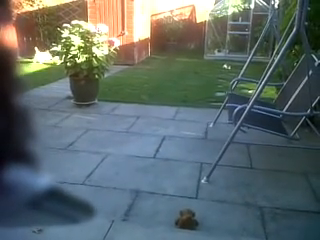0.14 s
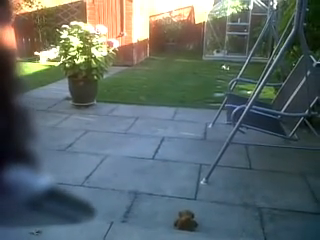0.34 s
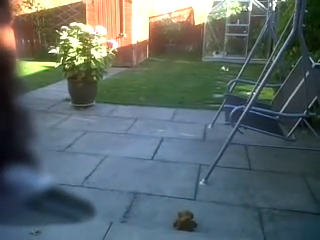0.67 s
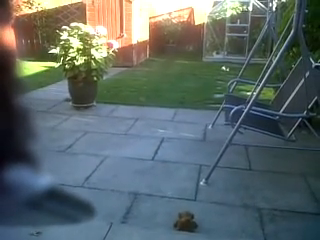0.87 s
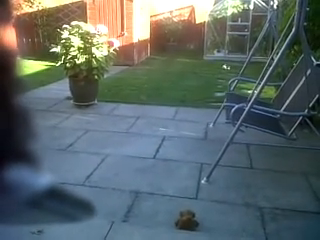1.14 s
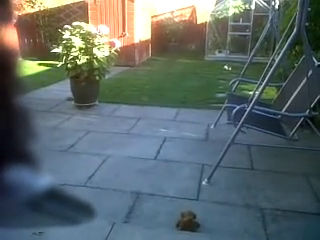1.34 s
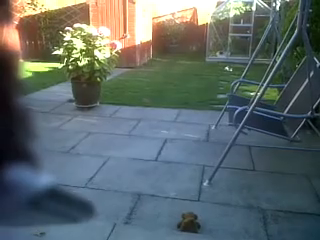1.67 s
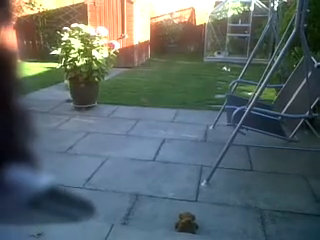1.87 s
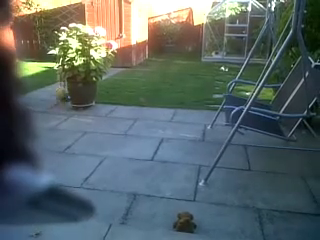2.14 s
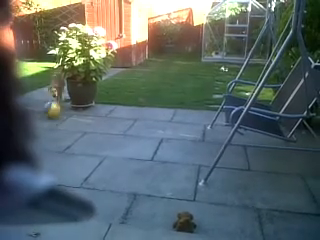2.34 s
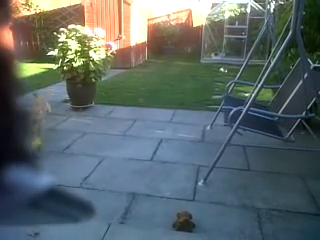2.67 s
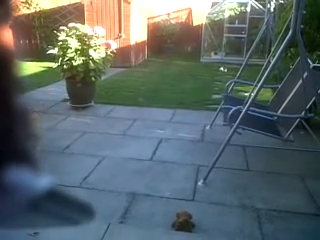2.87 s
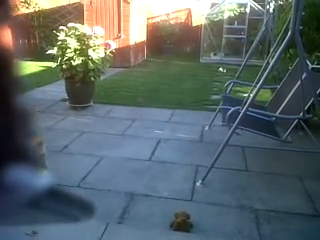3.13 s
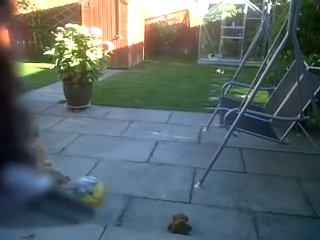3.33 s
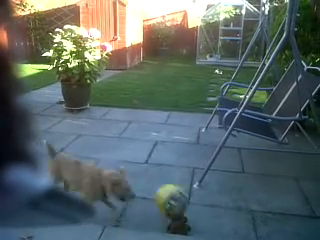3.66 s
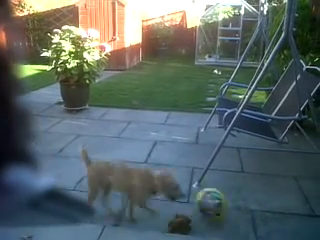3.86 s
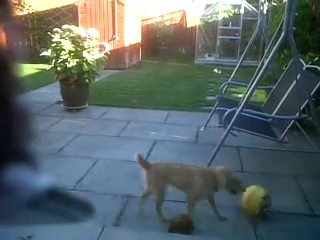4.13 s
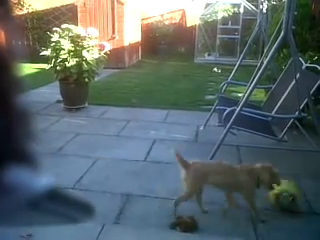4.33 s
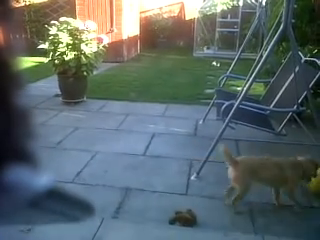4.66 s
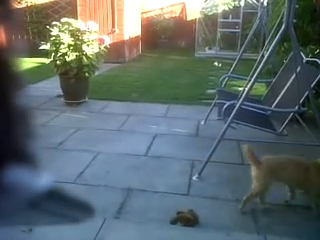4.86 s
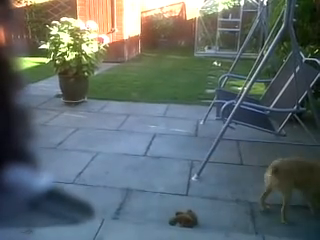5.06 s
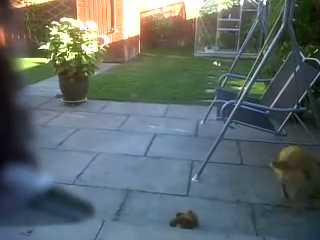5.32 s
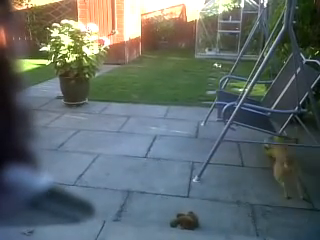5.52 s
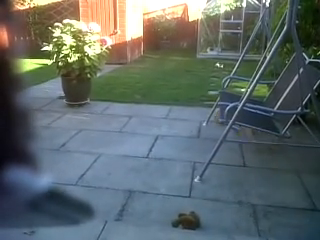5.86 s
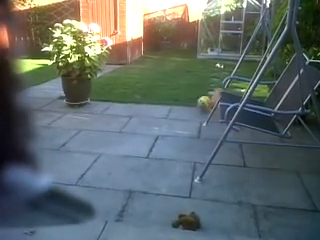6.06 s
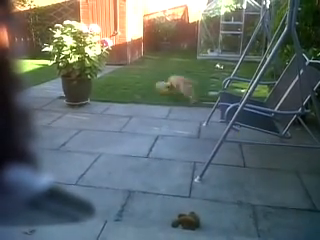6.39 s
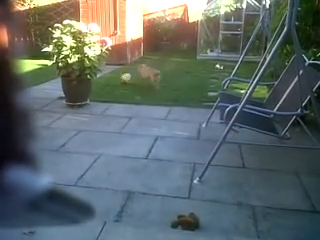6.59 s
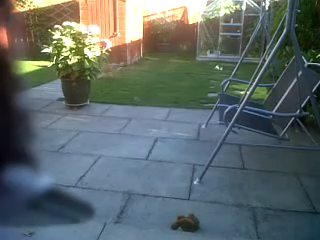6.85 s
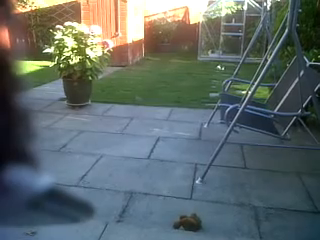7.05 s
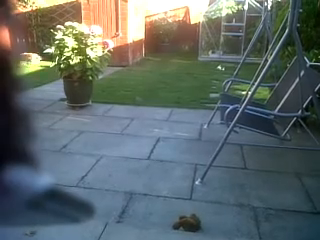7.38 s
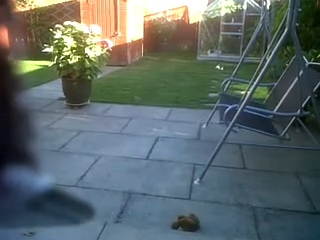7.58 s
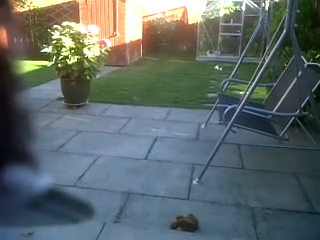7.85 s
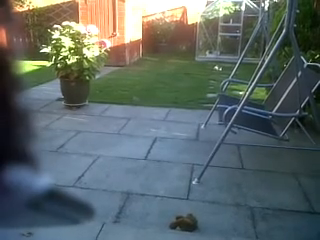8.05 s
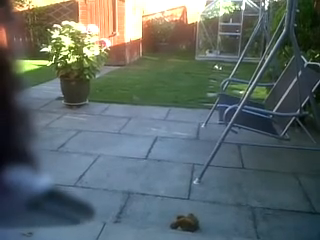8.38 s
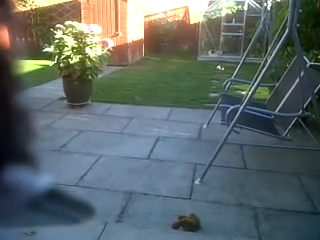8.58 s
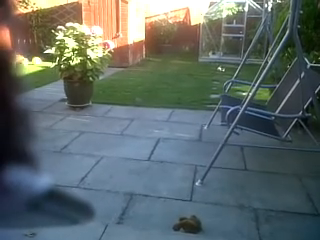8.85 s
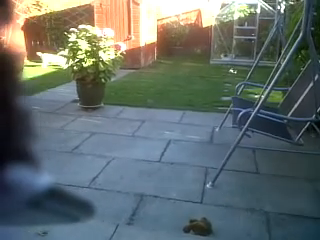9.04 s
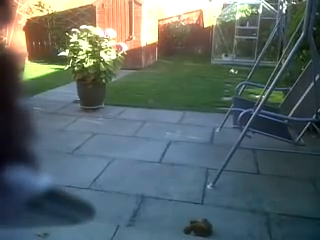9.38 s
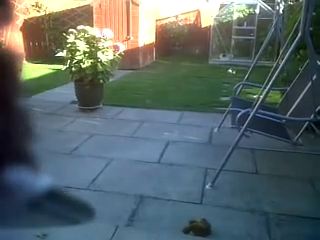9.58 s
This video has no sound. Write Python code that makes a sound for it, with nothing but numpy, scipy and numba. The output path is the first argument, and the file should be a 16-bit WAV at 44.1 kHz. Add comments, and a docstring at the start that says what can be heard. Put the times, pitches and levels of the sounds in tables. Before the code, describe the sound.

A small dog gives a few hoarse yaps at the start, then mostly pauses while a plastic ball pats and thumps over paving, paws scuff and dull bumps knock close to the microphone. One sharp bark comes near three seconds; from just after five seconds the barking becomes frequent and loud, echoing off walls and fences over faint outdoor air.

```python
"""A terrier is heard first, barking in short, hoarse yaps as it chases a plastic ball round a fenced garden.
Most barks open on a clearer pitch, then the folds roughen in the throat; a brief whine and a low growl join.
Dull bumps knock close by, the ball pats with a hollow thump, slap and ring, and paws scuff as shaped noise.
Echoes and noise tails answer from paving, fences and houses; faint outdoor air lies under it all.
A limiter holds down the loudest peaks, then they are rounded and the top is cut."""
import sys
import numpy as np
from scipy import signal
from scipy.fft import rfft, irfft
from scipy.io import wavfile
from scipy.ndimage import uniform_filter1d, minimum_filter1d
from numba import njit

SR = 44100
rng = np.random.default_rng(int(sys.argv[2]) if len(sys.argv) > 2 else 0)


def pcm_store(signal):
    """Save signal as 16-bit PCM."""
    levels = np.round(np.clip(np.atleast_2d(signal), -1, 1) * 32767)
    wavfile.write(sys.argv[1], SR, levels.astype(np.int16).T)


N = 428211
T = np.arange(N) / SR

# The dog's calls: barks, a brief whine and a low growl; a bark may catch and surge again in its own row.
#   start t/s, length t/s, swell t/s, clear opening t/s, level/dB, fade by the end level/dB,
#   top pitch f/Hz, scoop from below/0-1, pitch drop by the end/0-1, roughness once broken/0-1,
#   depth of the one-in-three beat of the folds/ratio, first throat resonance f/Hz, second f/Hz,
#   second while clear level/dB, second once rough level/dB, chest level/dB, open mouth level/dB,
#   huff at full roughness level/dB
CALL_GESTURES = [ (0, 0.035, 0.0011, .001, -26.5, 22, 475, 0.03, 0.23, 0.63, .8, 1060, 1660, -5.5, 4, -33, 1.5, -54.5),
                 (0.051, 0.14, 0.069, .012, -16, 6.5, 489.4, .1, 0, 0.95, .73, 1090, 1765, -9.5, -2, -10, -2, -44.5),
                 (0.599, 0.068, .044, 0.016, -21.5, 6.5, 580, 0.05, 0.1, 0.51, 1.7, 1166, 1787, -3, -11.5, -11.5, -20.5, -39),
                 (0.88, 0.064, 0.038, 0.014, -25.5, 16, 759, .18, 0.01, 0.9, 1.5, 856, 1700, -4, -3.5, -26, -6.5, -41),
                 (1.294, 0.076, 0.021, 0.025, -26, 6, 845.5, 0.08, 0.04, 0.72, 0.77, 884, 1580, 1, -6, 0.5, -10, -43),
                 (2.839, .132, 0.017, 0.0041, -12.5, 6, 939.4, 0.13, .06, 0.59, 2.44, 1012, 1860, -8.5, 2, -7, -0.5, -45.5),
                 (5.273, 0.071, .014, 0.019, -11, 4, 933.4, 0.15, .01, 0.59, 4, 1116, 1900, 0.5, 1.5, -6.5, -6.5, -50.5),
                 (5.677, 0.16, 0.03, 0.015, -11.5, 9.5, 620.8, 0.1, .32, 0.63, 1.14, 1178, 1900, -5.5, -1, -12, -5.5, -50.5),
                 (6.314, 0.18, 0.02005, 0.021, -15, 9, 885.4, 0.2, 0.18, .7, 2, 1254, 1726, 10.5, -0.5, -12.5, -11, -55),
                 (6.882, 0.13, 0.03, 0.018, -16.5, 0.5, 544.7, .1, 0.06, 0.65, 0.64, 1117, 1743, -11.5, -5, -7.5, -8, -42.5),
                 (7.191, .15, 0.043, 0.0044, -13.5, 12.5, 533.9, 0, 0.02, 0.71, 0.65, 1190, 1660, -3.5, -2.5, -20.5, -6, -44),
                 (7.672, 0.13, 0.0344, 0.012, -15.5, 10, 516, .12, .15, 0.85, 1.3, 1080, 1510, -20.5, -5.5, -7.5, -5, -45),
                 (8.231, 0.031, 0.0094, 0.0077, -32.5, 7.5, 552, 0.02, 0.13, 0.17, .1, 1130, 1664, -21, -16, 2.5, -18.5, -42),
                 (8.326, .147, .05, .028, -13.5, 9, 638.3, 0.13, 0.14, .85, 0.81, 1235, 1614, -14, -3.5, -8, -9.5, -44),
                 (8.991, 0.11, 0.058, 0.0084, -15, 3, 526.5, 0.04, 0.01, 0.53, 0.84, 1083, 1695, -6.5, -7.5, -9, -9, -36.5),
                 (9.117, .03, 0.017, .002, -13, 6.5, 528.8, 0.01, .03, 0.54, 1.17, 1150, 1690, -4, -8.5, -9, -8, -46),
                 (9.447, 0.1, 0.012, 0.011, -32.5, -9.5, 515, .04, 0, 0.54, 0.61, 1085, 1660, -8, -6, -5.5, -8.5, -43.5),
                 (9.528, 0.13, 0.041, .002, -16, 5, 524.8, .08, 0.02, .75, 0.43, 1154, 1626, -3, -5, -12.5, -4.5, -44.5),
                 ]
# Upper resonances of the open mouth: f/Hz, width of each filter pass f/Hz, level/dB
MOUTH_RESONANCES = [(2520, 715, 15.5), (3040, 760, 9.5), (3330, 680, -7.5)]
# Colour of the outdoor air: f/Hz, relative level/dB
AIR_COLOUR = [(15, -60), (25, -28), (91, -1.5), (124, -10.5), (247, -5.5), (714, -12.5), (813, -10),
              (2560, -16), (2850, -21.5), (3110, -23), (4390, -32.5), (5710, -37.5), (9660, -120)]
# Echoes from paving, house wall and fences: delay t/s, level/dB
WALL_ECHOES = [(.0026, -21.5), (.0075, -17), (.021, -20), (0.036, -17), (0.05, -14), (0.093, -29.5)]
# Dull bumps close by: start t/s, body level/dB, deep thud level/dB (both before envelope and layer trim)
BUMP_HITS = [(0.465, -41, -49.5), (1.975, -59, -47), (2, -60, -45), (2.151, -43.5, -61),
             (3.108, -26.5, -37), (3.215, -27, -39), (3.276, -38.5, -46), (3.408, -38, -44.5),
             (5.266, -31.5, -63), (6.483, -33.5, -56), (7.09, -30.5, -45), (7.329, -36, -66),
             (7.8, -24.5, -39), (7.863, -29.5, -39.5), (9.378, -26.5, -57), (9.399, -31.5, -37.5),
             (9.444, -29, -73.5)]
# Ball pats: start t/s, hollow thump level/dB, slap level/dB (both before layer trim)
BALL_PATS = [(1.784, -38, -51.5), (2.028, -41, -53.5), (2.402, -38.5, -53), (2.525, -39.5, -53.5),
             (2.678, -49, -51), (3.365, -28, -45.5), (3.604, -45, -49), (4.059, -42, -53),
             (4.281, -56, -56.5), (4.5, -41, -55.5), (4.684, -43.5, -61.5), (4.821, -33.5, -51.5),
             (4.985, -40.5, -55.5), (5.136, -49, -53), (6.16, -43.5, -58), (6.273, -36, -51)]
# Ring of the ball: f/Hz, mean relative level/dB, decay by 60 dB t/s
BALL_RING = [(935, -32.5, 0.026), (1250, -6, 0.14), (1370, 5.5, 0.17), (1720, -11.5, 0.12),
             (1830, 12, 0.0095), (2380, 2.5, 0.12), (2530, -1, 0.012), (3430, -19, .05), (3885, 6, 0.035)]
# Colour of the ball's slap: f/Hz, relative level/dB
SLAP_SPECTRUM = [(240, -22), (400, -4), (799, -12), (1530, -9.5), (1850, -0.5), (2090, -7.5), (2410, -7),
                 (2850, -8.5), (4390, -19.5), (5710, -34), (9660, -120)]
# Paws scuffing the ground: start t/s, length t/s, mid-scuff level/dB
PAW_SCUFFS = [(1.818, 0.12, -54.5), (2.018, 0.22, -53), (3.105, 0.07, -36), (3.433, 0.085, -49),
              (4.547, 0.36, -64.5), (7.078, 0.079, -41)]
# Colour of the scuffs: f/Hz, relative level/dB
SCUFF_SPECTRUM = [(240, -30), (400, 2.5), (609, -30.5), (660, -15.5), (1180, 3.5), (1990, 1), (2150, 5),
                  (3450, -8.5), (4390, -18.5), (5710, -45.5), (9660, -120)]

# What all calls share: they start soft, and the mouth opens as they go
CHEST_HZ, CHEST_WIDTH_HZ = 717, 252
ATTACK_CYCLES = 7.5  # top-pitch cycles until the voice is fully on, so high yelps start sharpest
SOFT_START_DB = -16  # below the top of the swell
BREAK_S = 0.017  # from clear to fully rough
SCOOP_S = 0.03556  # length of the climb in pitch
DROP_CURVE = 1.4  # above 1 the pitch falls faster towards the end
THROAT_FOLLOW, SECOND_FOLLOW = 0.67, 0.31  # powers by which the two throat resonances follow the pitch
MOUTH_OPEN_S, MOUTH_SHUT_DB = 0.027, -9.5  # time constant; upper resonances are muffled at first
JAW_SHIFT = 0.064  # share by which the half-shut jaw lowers the first resonance
PUSH_BRIGHT = 0.13  # dB of extra brightness for each dB of pressure
HEAVE_DB, HEAVE_HZ = 3, 30.2  # uneven push of air, at full roughness
GARDEN_DB, AIR_SWELL_DB = -58.5, 1.3
TOP_HZ = 8300


def undb(db):
    """Decibels to gain."""
    return 10 ** (np.asarray(db) / 20)


def unit(x):
    """Scale to rms 1."""
    return x / np.sqrt(np.mean(x ** 2))


def steady(x, size=700):
    """Hold the short-time rms at 1 over a window of size samples."""
    return x / np.sqrt(uniform_filter1d(x ** 2, size) + 1e-12)


def add(out, start, x):
    """Mix x into out from a start time in seconds."""
    i = max(int(start * SR), 0)
    out[i:i + len(x)] += x[:len(out) - i]


@njit
def band(x, hz, width):
    """State-variable band-pass whose centre may move every sample."""
    y, b, l = np.empty(len(x)), 0., 0.
    for i in range(len(x)):
        g, k = np.tan(np.pi * hz[i] / SR), width / hz[i]
        v = (b + g * (x[i] - l)) / (1 + g * (g + k))
        b, l, y[i] = 2 * v - b, l + 2 * g * v, k * v
    return y


def resonate(x, hz, width):
    """A resonance applied twice, for steep skirts."""
    hz = hz * np.ones(len(x))
    once = band(x, hz, float(width))
    return band(once, hz, float(width))


def cut(x, hz, kind, order=2):
    """Low-pass or high-pass."""
    return signal.sosfilt(signal.butter(order, hz, kind, fs=SR, output="sos"), x)


def flutter(n, hz):
    """Random motion up to a rate, rms 1."""
    return unit(cut(rng.standard_normal(n), hz, "low"))


def noise(points, n):
    """Noise coloured by a curve of f/Hz, level/dB points, rms 1."""
    hz, db = np.transpose(points)
    f = np.maximum(np.fft.rfftfreq(n, 1 / SR), 1)
    colour = undb(np.interp(np.log(f), np.log(hz), db))
    return unit(irfft(rfft(rng.standard_normal(n)) * colour, n))


def fade(t, t60):
    """A decay of 60 dB in t60."""
    return np.exp(-np.log(1000) * t / t60)


def gesture(t, length_s, swell_s, clear_s, fade_db, scoop, drop):
    """Pressure swells, pitch scoops up and folds break: (level dB, pitch ratio, breaking 0-1, brightness dB)."""
    swell = np.sin(np.pi / 2 * np.clip(t / swell_s, 0, 1)) ** 2
    spent = np.clip((t - swell_s) / (length_s - swell_s), 0, 1)
    push_db = SOFT_START_DB * (1 - swell) - fade_db * spent
    climb = 1 - scoop * np.maximum(1 - t / SCOOP_S, 0) ** 2
    bend = climb * (1 - drop * spent ** DROP_CURVE)
    broken = np.clip((t - clear_s) / BREAK_S, 0, 1)
    gape_db = MOUTH_SHUT_DB * np.exp(-t / MOUTH_OPEN_S) + PUSH_BRIGHT * push_db
    return push_db, bend, broken, gape_db


def folds(hz, rough, thirds, jitter=0.051, wander=0.0299, shimmer=0.62, rasp=1.0, slope=0.29):
    """Vocal fold pulses; with roughness their timing and size scatter and every third one stands out."""
    n = len(hz)
    unsteady = jitter * rough * flutter(n, 214) + wander * np.sqrt(rough) * flutter(n, 53.3)
    phase = 2 * np.pi * np.cumsum(hz * (1 + unsteady)) / SR
    pulses = unit(sum(np.cos(k * phase) / k ** slope for k in np.arange(1, 10)))
    beat = np.cos(phase / 3)
    size = 1 + rough * (thirds * beat + shimmer * flutter(n, 490))
    # air tears through the open folds once a cycle
    air = unit(cut(rng.standard_normal(n), 2200, "low") * (1 + np.cos(phase)))
    return pulses * size * (1 - rough / 2) + rasp * rough * air


def call(row, first_width_hz=560, second_width_hz=540, quiver=0.056, release_s=0.0041,
         opening_rough=.15, hiss_db=-64):
    """The folds drive throat resonances that follow the pitch, and upper ones that emerge as the mouth opens."""
    (_, length_s, swell_s, clear_s, top_db, fade_db, top_hz, scoop, drop, hoarse, thirds,
     first_hz, second_hz, clear_db, broken_db, chest_db, open_db, huff_db) = row
    t = np.arange(0, length_s + release_s, 1 / SR)
    push_db, bend, broken, gape_db = gesture(t, length_s, swell_s, clear_s, fade_db, scoop, drop)
    rough = np.clip(hoarse * (opening_rough + (1 - opening_rough) * broken), 0, 1)
    level_db = top_db + push_db + HEAVE_DB * rough * flutter(len(t), HEAVE_HZ)
    source = cut(folds(top_hz * bend, rough, thirds), 590, "high", order=6)

    # the soft throat walls shake under a rough voice and move the throat and mouth resonances
    shake = 1 + quiver * rough * flutter(len(t), 50)
    jaw = 1 - JAW_SHIFT * np.exp(-t / MOUTH_OPEN_S)
    first = resonate(source, first_hz * jaw * bend ** THROAT_FOLLOW * shake, first_width_hz)
    second = resonate(source, second_hz * bend ** SECOND_FOLLOW * shake, second_width_hz)
    chest = resonate(source, CHEST_HZ, CHEST_WIDTH_HZ)
    body = steady(first + undb(chest_db) * chest)
    second_db = clear_db + (broken_db - clear_db) * broken
    body = steady(body + undb(second_db) * steady(second))
    mouth = steady(sum(undb(db) * resonate(source, f * shake, width) for f, width, db in MOUTH_RESONANCES))
    voice = steady(cut(body + undb(open_db + gape_db) * mouth, 3168, "low", order=6))

    # air hisses past the teeth, and a low huff goes with soft and loud calls alike
    hiss = undb(hiss_db) * unit(resonate(rng.standard_normal(len(t)), 6700, 2100))
    huff = undb(huff_db) * rough * unit(resonate(rng.standard_normal(len(t)), 503, 290))
    attack = np.clip(t * top_hz / ATTACK_CYCLES, 0, 1)
    release = np.clip((t[-1] - t) / release_s, 0, 1)
    return ((voice + hiss) * undb(level_db) + huff) * attack * release


def terrier():
    """The dog's barks, a brief whine and a low growl; a bark may catch and surge again in its own row."""
    out = np.zeros(N)
    for row in CALL_GESTURES:
        add(out, row[0], call(row))
    return out


def garden():
    """Faint outdoor air: coloured noise, swelling a little."""
    level_db = GARDEN_DB + AIR_SWELL_DB * flutter(N, 1.8) + .5 * flutter(N, 23)
    return noise(AIR_COLOUR, N) * undb(level_db)


def walls(x, near_db=-9, near_t60=0.4, far_db=-27, far_t60=0.97, build_s=0.0077):
    """Distinct echoes, scatter between the fences, and a faint long tail from the houses around."""
    t = T[:SR]
    build = 1 - np.exp(-t / build_s)
    near = unit(cut(rng.standard_normal(SR), 6200, "low")) * fade(t, near_t60) * build
    far = unit(cut(rng.standard_normal(SR), 5800, "low")) * fade(t, far_t60) * build
    # the one-second tails are scaled by energy
    response = (undb(near_db) * unit(near) + undb(far_db) * unit(far)) / np.sqrt(SR)
    for delay, db in WALL_ECHOES:
        add(response, delay, undb([db]))
    return signal.fftconvolve(x, response)[:N]


def bumps(t60=0.11, body_db=-4, deep_db=4):
    """Soft knocks close by: a short boxy rumble over a deep thud, both decaying resonant noise."""
    out, t = np.zeros(N), T[:SR // 4]
    envelope = fade(t, t60) * (1 - fade(t, 0.025))
    for start, mid_db, low_db in BUMP_HITS:
        body = steady(resonate(rng.standard_normal(len(t)), 280, 220))
        deep = steady(resonate(rng.standard_normal(len(t)), 95, 140))
        knock = undb(mid_db + body_db) * body + undb(low_db + deep_db) * deep
        add(out, start, knock * envelope)
    return out


def ball(thump_hz=255, thump_t60=0.077, slap_t60=0.076, thump_db=-1, slap_db=4, ring_db=-10):
    """Each pat flexes the shell with a hollow thump; the skin scrapes as it flattens and the air inside rings."""
    out, t = np.zeros(N), T[:SR // 4]
    contact_s = .011  # the slap holds this long before it decays
    press = np.minimum(10 * t / contact_s, 1)  # fully on after a tenth of the contact
    for start, low_db, high_db in BALL_PATS:
        pitch = thump_hz * (1 + 0.062 * rng.standard_normal())
        hollow = .5 * unit(resonate(rng.standard_normal(len(t)), 280, 380))
        thump = (np.sin(2 * np.pi * pitch * t) + hollow) * fade(t, thump_t60)
        ring = np.zeros(len(t))
        for f, db, t60 in BALL_RING:
            strength = undb(db + 3.9 * rng.standard_normal())
            ring += strength * np.sin(2 * np.pi * f * t) * fade(t, t60)
        grit = undb(2.5 * flutter(len(t), 200))
        slap = noise(SLAP_SPECTRUM, len(t)) * fade(np.maximum(t - contact_s, 0), slap_t60) * grit
        low = undb(low_db + thump_db) * thump
        high = undb(high_db + slap_db) * (slap + undb(ring_db) * ring)
        add(out, start, press * (low + high))
    return out


def paws():
    """Gritty swishes as the dog skids and turns: coloured noise that rises and falls with a fast flutter."""
    out = np.zeros(N)
    for start, length, db in PAW_SCUFFS:
        n = int(length * SR)
        swish = np.sin(np.linspace(0, np.pi, n))
        grit = undb(db + 0.87 * flutter(n, 120))
        add(out, start, noise(SCUFF_SPECTRUM, n) * swish * grit)
    return out


def scene(ground_wet_db=-7):
    """Dog and ball between the garden walls, over still air; sounds at ground level stir the walls less."""
    dog = terrier()
    ground = ball() + paws()
    answer = walls(dog + undb(ground_wet_db) * ground)
    return (dog + ground + answer + bumps() + garden())[None]


def record(dry, limit=0.58, ceiling=0.59, size=660):
    """A fast limiter (window in samples) holds peaks down, the last are rounded off, and the top is cut."""
    gain = np.minimum(limit / (np.abs(dry) + 1e-9), 1)
    held = dry * uniform_filter1d(minimum_filter1d(gain, size), size)
    rounded = held / (1 + (held / ceiling) ** 8) ** (1 / 8)
    return signal.sosfilt(signal.ellip(8, .2, 70, TOP_HZ, fs=SR, output="sos"), rounded)


dry = scene()
out = record(dry)
pcm_store(out)
```